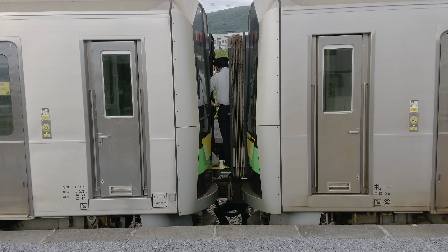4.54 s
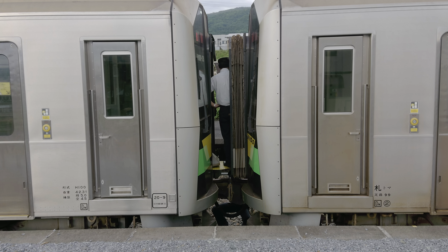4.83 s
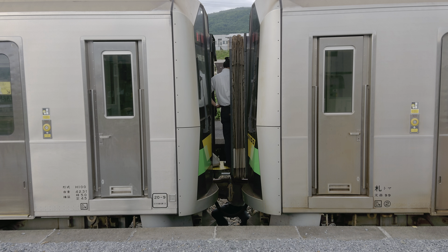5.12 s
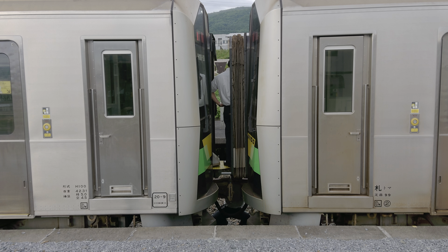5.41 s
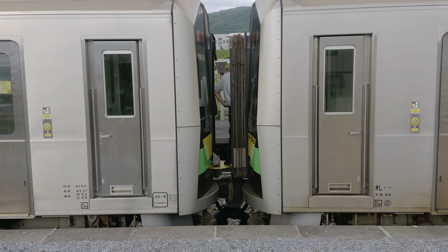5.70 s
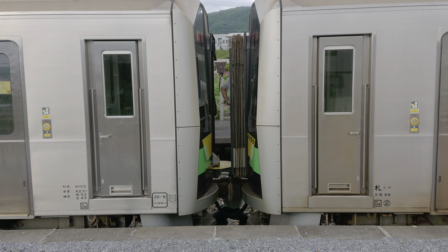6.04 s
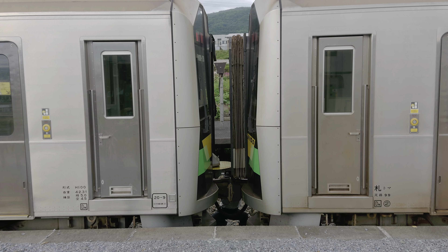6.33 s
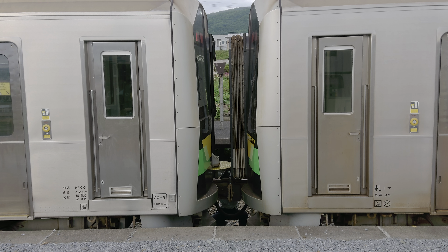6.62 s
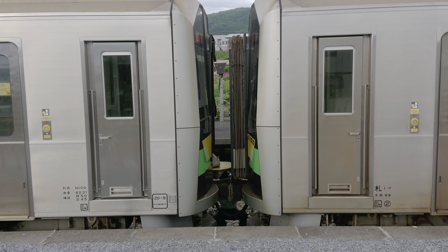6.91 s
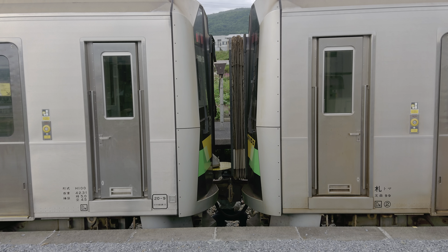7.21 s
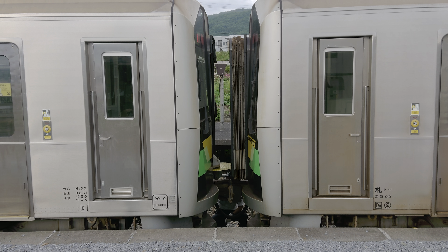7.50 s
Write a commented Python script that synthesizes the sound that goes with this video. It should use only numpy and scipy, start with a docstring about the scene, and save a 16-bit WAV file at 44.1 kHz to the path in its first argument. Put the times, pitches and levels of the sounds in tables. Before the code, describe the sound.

From the start, two coupled diesel railcars idle a few metres away at a station platform. The engine makes a steady low throb with soft, rapid knocking, the body panels drone, and gears and fans whirr under the floor, the brighter whirr leaning to the right. This idle continues unchanged throughout. At about 1.9 seconds, one sharp, dry tick sounds close on the right. At about 3.9 seconds, a valve opens and compressed air suddenly rushes out in a bright, high hiss, somewhat to the right. The hiss steps up in strength at about 4.6 seconds, holds briefly, then fades gradually from about 5.2 seconds as the pressure drops. At about 5.6 seconds, the valve gives one short metallic clack on the right. The hiss keeps dying away over the running engine.

```python
"""At a station platform, a few metres from two coupled diesel railcars standing at idle.
Periodic firing drives the sound: a six-cylinder engine throbs through its silencer, its block knocks
and the body panels drone, while gears and fans whirr under the floor. A valve opens and a turbulent
jet of compressed air hisses out, fading as the pressure drops; an impact of the valve gear clacks once.
Earlier, one dry tick sounds on the right."""
import sys
import numpy as np
from scipy import signal
from scipy.fft import rfft, irfft
from scipy.io import wavfile

SR = 44100
rng = np.random.default_rng(int(sys.argv[2]) if len(sys.argv) > 2 else 0)


def persist_wave(psi):
    """Save psi, clipped to +-1, as 16-bit WAV."""
    counts = np.round(np.clip(psi, -1, 1) * 32767).astype(np.int16)
    wavfile.write(sys.argv[1], SR, np.atleast_2d(counts).T)


N = 337806
T = np.arange(N) / SR
HZ = np.maximum(np.arange(N // 2 + 1) * SR / N, 1)
CYCLE_HZ = 6.7497  # four-stroke cycle rate; order n is its nth harmonic


# Exhaust harmonics: order, level/dB
EXHAUST_ORDERS = [(6, -33.5), (9, -22.5), (10, -41), (12, -24.5), (15, -39), (18, -41)]

def exhaust(cycles, silencer_hz=73, width_hz=14.6, waver_db=.55):
    """Superposition: the lowest engine orders leave the silencer and beat into a steady throb."""
    crank = cycles + .005 * np.sin(2 * np.pi * cycles)  # unequal cylinders turn the crank unevenly
    throb = 0
    for order, db in EXHAUST_ORDERS:
        # the silencer's resonance delays the orders above it
        shift = 2 * np.angle(resonance(order * CYCLE_HZ, silencer_hz, width_hz))
        throb -= undb(db + waver_db * walk(3.8)) * np.sin(2 * np.pi * order * crank + shift)
    return np.sqrt(2) * pan(-2.5) * throb


# Broadband spectrum of the block: f/Hz, left and right spectrum level/dB
BLOCK_SPECTRUM = [(25, -71, -70), (40, -63, -61), (65, -54, -52), (120, -54, -53), (190, -64, -62),
                  (260, -61, -60), (380, -60, -60), (540, -67, -65), (800, -65, -63), (875, -73, -71),
                  (1100, -68, -65), (1500, -74, -75), (2000, -78, -73)]
# Modes of block and underframe: f/Hz, bandwidth/Hz, gain/dB
FRAME_MODES = [(284, 30, 5), (340, 30, 5), (390, 25, 4), (474, 24, 9), (612, 14, 5), (683, 28, 7),
               (738, 25, 4), (1024, 32, 6)]

def engine_block(cycles, coherent_hz=500, lag_cycles=.02):
    """Impact excitation: each firing rattles the block; its long waves reach both sides alike."""
    knocks = firing_envelope(cycles - lag_cycles, depth=.8, decay=.25, weak_db=-6, scatter_db=1)
    a, b = cyclic_noise(cycles, repeat=.27) * knocks
    coherence = .92 * lowpass(coherent_hz, order=2)
    mid = shape(a, np.sqrt((1 + coherence) / 2))
    side = shape(b, np.sqrt((1 - coherence) / 2))
    response = colour(BLOCK_SPECTRUM) * mode_gain(FRAME_MODES) * lowpass(1305, order=6)
    return shape(np.array([mid + side, mid - side]), response)


# Harmonics of the body panels: order, level/dB
PANEL_ORDERS = [(36, -47), (39, -43), (41, -45), (42, -41), (48, -45), (49, -49), (50, -36), (58, -48),
                (59, -48), (68, -48), (69, -49), (70, -41), (71, -42), (72, -45), (81, -52), (90, -52),
                (91, -47), (92, -54), (93, -53), (100, -52), (102, -50), (103, -54)]

def body_panels(cycles, waver_db=.63):
    """Forced vibration: panels radiate the higher engine orders, each swelling a little on its own."""
    drone = 0
    for order, db in PANEL_ORDERS:
        dispersion = .523 * np.pi * order ** 2  # bending waves disperse, evening out the drone
        drone += undb(db + waver_db * walk(2.7)) * np.sin(2 * np.pi * order * cycles + dispersion)
    return np.sqrt(2) * pan(.2) * drone


# Whirr of gears, pump and intake: f/Hz, left and right spectrum level/dB
GEAR_SPECTRUM = [(1540, -73.5, -75.5), (2540, -77.5, -66), (2680, -79, -67), (3500, -74.5, -68),
                 (4510, -79.5, -69.5), (4980, -83, -76.5), (5370, -77.5, -66), (5760, -78, -73.5),
                 (5850, -85, -84), (6970, -85, -94.5), (7500, -93, -110), (10800, -96, -93.5),
                 (16000, -95.5, -106)]

def gears(cycles):
    """Amplitude modulation: bright noise of gears, injection pump and intake pulses with the firings."""
    noise = cyclic_noise(cycles, repeat=.29)
    noise *= firing_envelope(cycles, depth=.15, decay=.21, weak_db=0, scatter_db=5)
    flicker = undb(.39 * walk(11) + .44 * walk(65))
    whirr = underfloor(noise * flicker, wet_db=-8.5, t60=.093)
    return shape(whirr, colour(GEAR_SPECTRUM) * highpass(1460, order=6))


# Stages of the valve's opening: t/s, flow gain/dB, extra gain of the lower roar/dB
VALVE_STAGES = [(3.85, -2.5, 2.2), (4.565, .7, .5)]

def discharge(travel_s=.028, hold_until_s=5.185, fall_db_per_s=6, roar_until_s=5.08, roar_loss_db=2.5):
    """Exponential discharge: gains of flow and roar as the valve opens and the reservoir later drains."""
    flow, roar_db = 0, 0
    for start, stage_db, stage_roar_db in VALVE_STAGES:
        moved = np.clip((T - start) / travel_s, 0, 1)
        flow += moved * (undb(stage_db) - flow)
        roar_db += moved * (stage_roar_db - roar_db)
    drained_db = fall_db_per_s * np.maximum(T - hold_until_s, 0)
    calmed = 1 - np.exp(-np.maximum(T - roar_until_s, 0) / .063)
    return flow * undb(-drained_db), undb(roar_db - roar_loss_db * calmed)


# Air jet at unit flow gain: f/Hz, left and right spectrum level/dB
JET_SPECTRUM = [(1490, -78.5, -77.5), (2130, -75, -67.5), (2830, -66, -57.5), (3440, -66, -56.5),
                (4780, -60.5, -53.5), (5660, -63.5, -59.5), (6740, -59, -62.5), (7240, -61, -86),
                (7740, -69.5, -100), (8400, -67, -72), (9450, -65.5, -65.5), (11300, -70.5, -63),
                (13500, -62, -65.5), (15600, -60.5, -64)]
# Modes of the vent pipe: f/Hz, bandwidth/Hz, gain/dB
PIPE_MODES = [(3568, 22, 6.5), (4630, 40, 2), (5828, 40, 3), (6329, 45, 3.5)]

def air_jet(roar_hz=6200, flutter_db=.38):
    """Turbulence: air hisses through the vent pipe; as pressure falls, the lower roar weakens first."""
    flow, roar_gain = discharge()
    flow *= undb(flutter_db * walk(23))
    turbulence = underfloor(rng.standard_normal((2, N)), wet_db=-7.5, t60=.077)
    jet = shape(turbulence, colour(JET_SPECTRUM) * mode_gain(PIPE_MODES))
    roar = shape(jet, lowpass(roar_hz, order=4) ** 2)
    return flow * (jet - roar + roar_gain * roar)


# Blow and rebounds of the valve gear: t/s, level/dB, T60/s
VALVE_BLOWS = [(5.6243, -11, .045), (5.6315, -17, .035), (5.648, -23, .09)]
# Modes of the valve gear: f/Hz, bandwidth/Hz, relative level/dB
VALVE_MODES = [(720, 140, -11), (980, 62, -4), (2120, 460, -5), (2560, 270, -4.5), (3530, 230, 3),
               (4400, 540, -0.5), (5160, 400, -6), (6240, 300, -3)]

def valve_gear(rise_s=.00037):
    """Impact and rebound: metal parts slam in short noise bursts coloured by their modes."""
    envelope = 0
    for start, db, t60 in VALVE_BLOWS:
        age = np.maximum(T - start, 0)
        envelope += undb(db) * (1 - np.exp(-age / rise_s)) * damping(age, t60)
    power = sum(np.abs(undb(db) * resonance(HZ, hz, width)) ** 2 for hz, width, db in VALVE_MODES)
    rattle = unit(shape(rng.standard_normal((2, N)), np.sqrt(power) * lowpass(6800, order=6)))
    return envelope * rattle * pan(-7)


# Dry tick: t/s, left and right peak level/dB
TICK_PEAKS = [(1.8776, -30, -4.5)]

def tick(thud_db=-31, thud_hz=700, thud_t60=.12):
    """Band-limited impulse: a dry tick close by on the right, with a faint, damped thud."""
    click, envelope = np.zeros((2, N)), 0
    for start, *sides_db in TICK_PEAKS:
        click[:, int(start * SR)] = undb(sides_db)
        envelope += (T >= start) * damping(np.abs(T - start), thud_t60)
    band = lowpass(4000, order=4)
    thud = unit(shape(rng.standard_normal((2, N)), np.abs(resonance(HZ, thud_hz, thud_hz)) ** 2))
    return shape(click, band / band.mean()) + undb(thud_db) * envelope * thud


# Tones of fans and auxiliary machines: f/Hz, level/dB, rms deviation/Hz
FAN_TONES = [(56.8, -44, .1), (113.6, -42, .2), (972, -51, 1.3)]

def fans():
    """Frequency modulation: each machine's tone wavers a little with its speed."""
    hum = 0
    for hz, db, deviation in FAN_TONES:
        phase = 2 * np.pi * np.cumsum(hz + deviation * walk(3.8)) / SR
        hum += undb(db) * np.sin(phase)
    return np.sqrt(2) * hum


def underfloor(x, wet_db, t60):
    """Reverberation: direct sound plus dense reflections between car body, track bed and platform."""
    t = T[:SR // 3]
    tail = rng.standard_normal((2, len(t))) * damping(t, t60)
    response = undb(wet_db) * tail / np.linalg.norm(tail, axis=1, keepdims=True)
    response[:, 0] += 1
    response /= np.linalg.norm(response, axis=1, keepdims=True)
    return signal.fftconvolve(x, response, axes=1)[:, :N]


def firing_envelope(cycles, depth, decay, weak_db, scatter_db):
    """Pulse train: six firings a cycle, alternate ones offset by weak_db; decay is in firing intervals."""
    firing = np.floor(6 * cycles).astype(int)
    since = 6 * cycles - firing
    size_db = weak_db * (firing % 2) + scatter_db * rng.standard_normal(512)[firing]
    return unit(1 + depth * undb(size_db) * np.exp(-since / decay))


def cyclic_noise(cycles, repeat):
    """Partial periodicity: stereo noise, of whose power the share `repeat` recurs every engine cycle."""
    period = int(SR / CYCLE_HZ)
    one_cycle = irfft(np.exp(2j * np.pi * rng.random((2, period // 2 + 1))), period)
    periodic = unit(one_cycle)[:, (cycles % 1 * period).astype(int) % period]
    return np.sqrt(repeat) * periodic + np.sqrt(1 - repeat) * rng.standard_normal((2, N))


def resonance(hz, centre_hz, width_hz):
    """Damped oscillator: complex response, 1 at its centre."""
    return 1 / (1 + 1j * (hz ** 2 - centre_hz ** 2) / (hz * width_hz))


def mode_gain(table):
    """Resonance: narrow peaks on a flat response."""
    return undb(sum(db * np.abs(resonance(HZ, hz, width)) ** 2 for hz, width, db in table))


def colour(table):
    """Spectral shaping: left and right gains that give unit noise the tabulated levels in 1 Hz bands."""
    hz, *sides = np.transpose(table)
    return undb([np.interp(np.log(HZ), np.log(hz), db) for db in sides]) * np.sqrt(SR / 2)


def damping(age, t60):
    """Exponential decay, 60 dB in t60 seconds."""
    return np.exp(-np.log(1000) * age / t60)


def walk(rate_hz):
    """Band-limited random fluctuation of rms 1."""
    return unit(shape(rng.standard_normal(N), lowpass(rate_hz, order=3)))


def shape(x, gain):
    """Linear filtering by a gain for every frequency."""
    return irfft(rfft(x) * gain, N)


def lowpass(edge_hz, order):
    """Maximally flat low-pass gain."""
    return 1 / np.sqrt(1 + (HZ / edge_hz) ** (2 * order))


def highpass(edge_hz, order):
    """Power-complementary high-pass gain."""
    return np.sqrt(1 - lowpass(edge_hz, order) ** 2)


def pan(db):
    """Interaural level difference, left over right, as two gains."""
    return undb([[db / 2], [-db / 2]])


def undb(db):
    """Level to amplitude ratio."""
    return 10 ** (np.asarray(db) / 20)


def unit(x):
    """Normalisation to rms 1."""
    return x / np.sqrt(np.mean(x ** 2))


def scene(first_firing_s=.014, ear_offset_s=.00016):
    """Superposition of all sources; the engine's parts share one phase, its tones leading on the right."""
    cycles = CYCLE_HZ * (T - first_firing_s) + .0008 * walk(1.5)  # the governor hunts slightly
    at_ears = cycles - CYCLE_HZ * np.array([[ear_offset_s], [-ear_offset_s]])
    engine = exhaust(at_ears) + body_panels(at_ears) + engine_block(cycles) + gears(cycles)
    return engine + fans() + air_jet() + valve_gear() + tick()


def record(dry, ceiling=.9, top_hz=15850):
    """Soft saturation rounds the highest peaks; a steep low-pass cuts the top."""
    rounded = dry / (1 + (dry / ceiling) ** 8) ** (1 / 8)
    passband = 1 / (1 + np.exp(np.clip((HZ - top_hz) / 30, -50, 50)))
    return shape(rounded, passband)


dry = scene()
out = record(dry)
persist_wave(out)
```